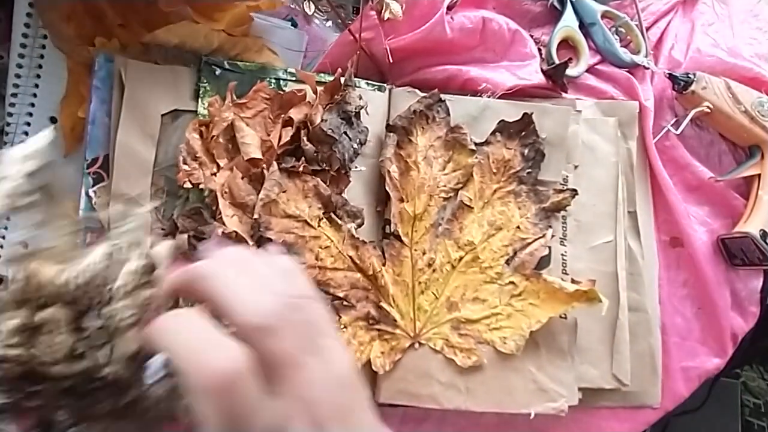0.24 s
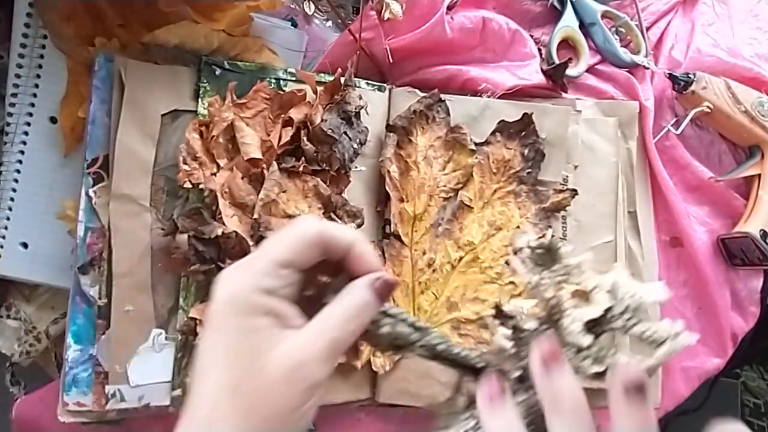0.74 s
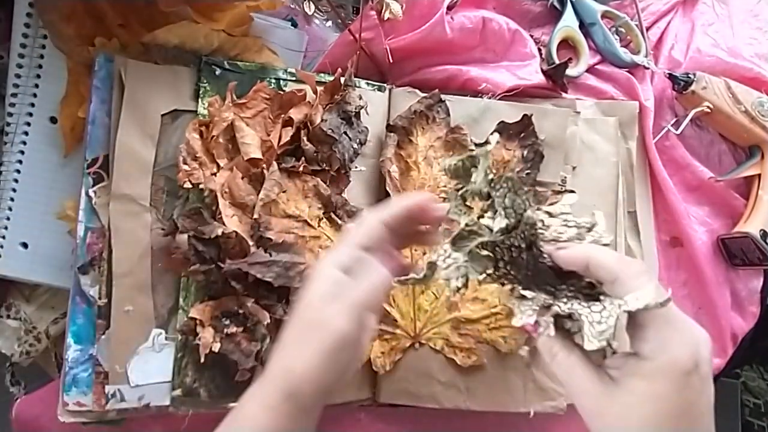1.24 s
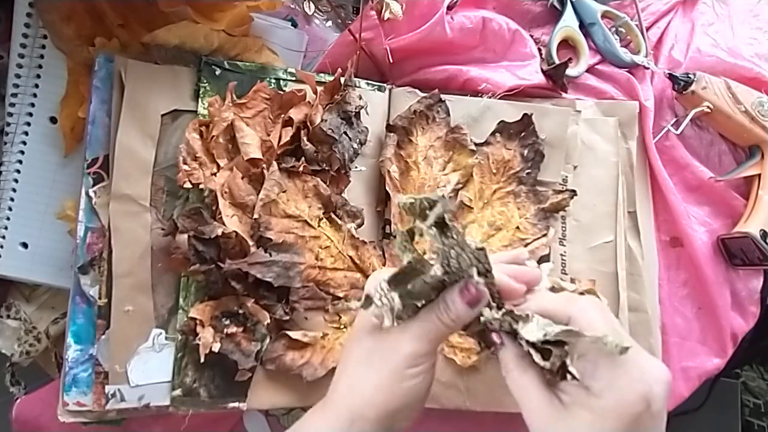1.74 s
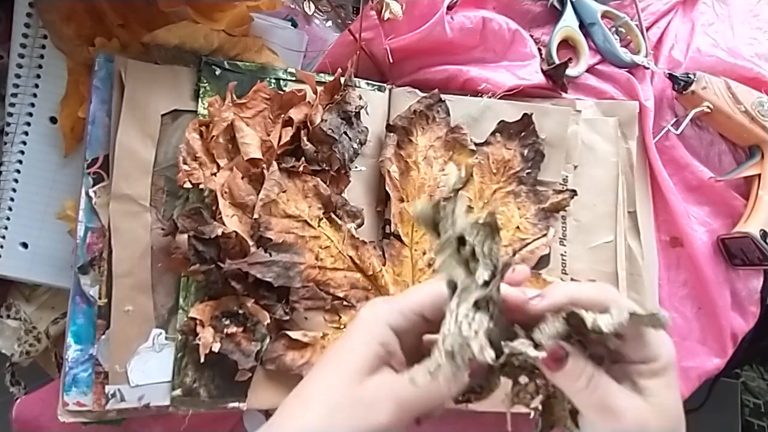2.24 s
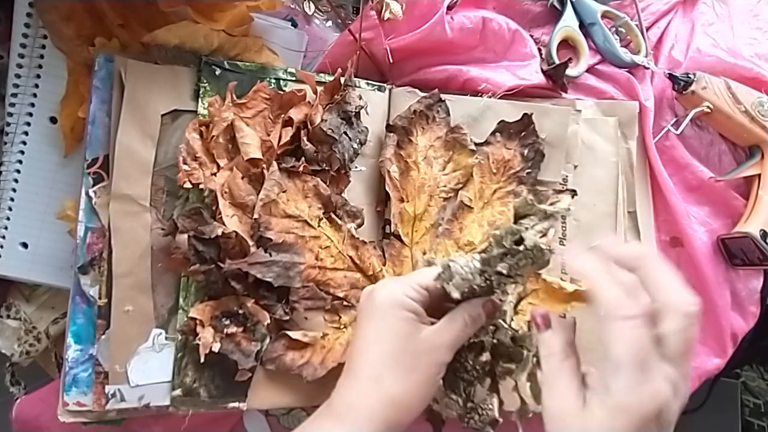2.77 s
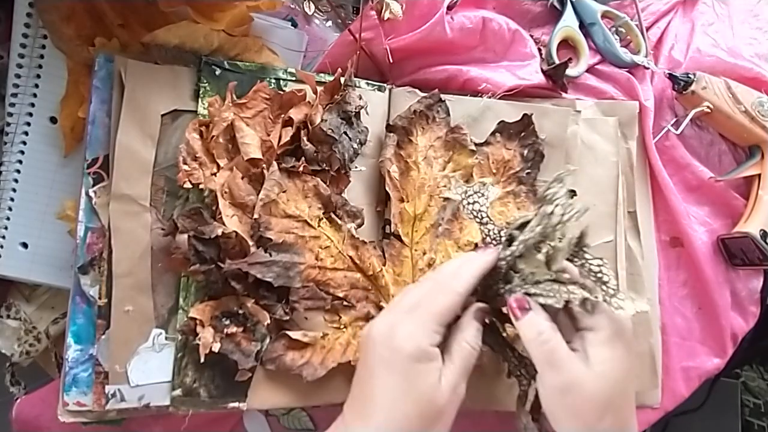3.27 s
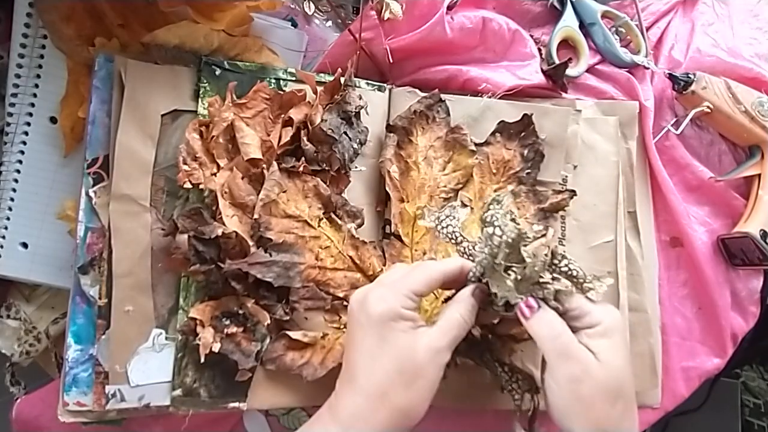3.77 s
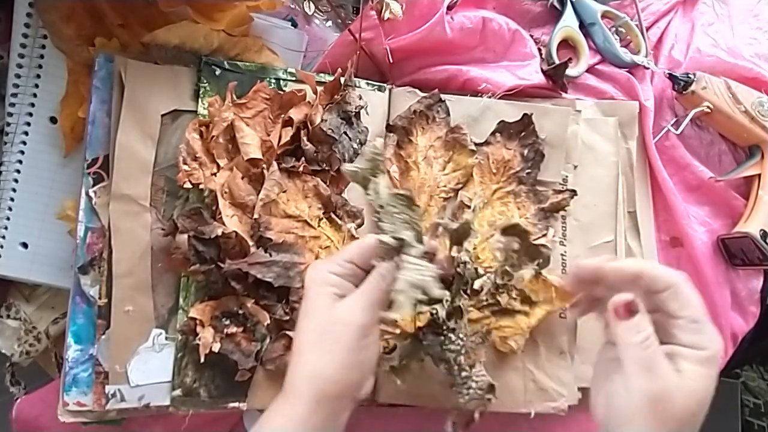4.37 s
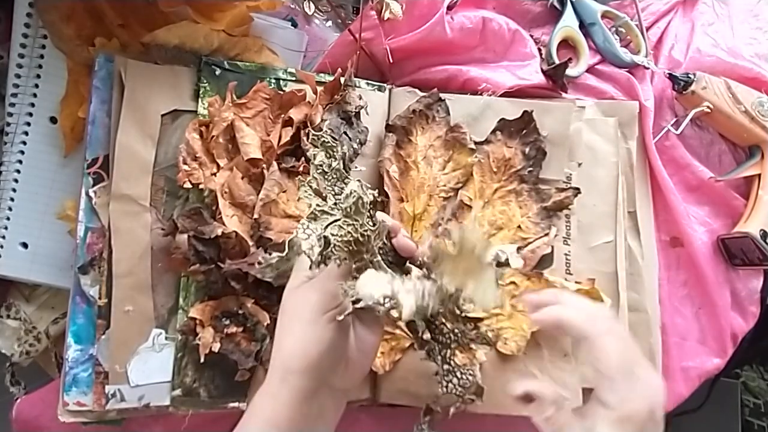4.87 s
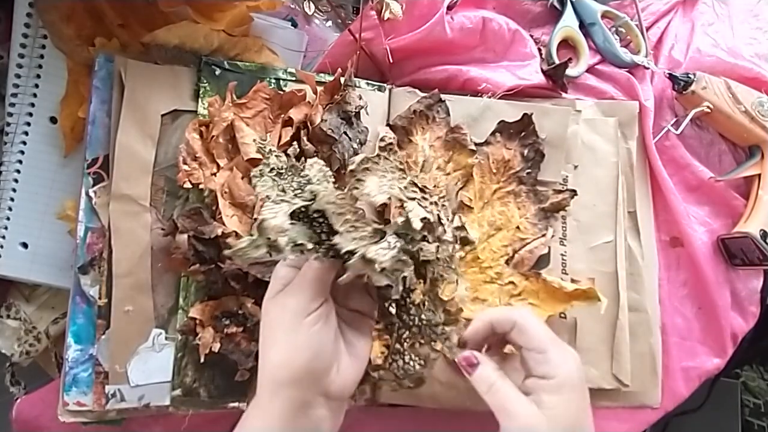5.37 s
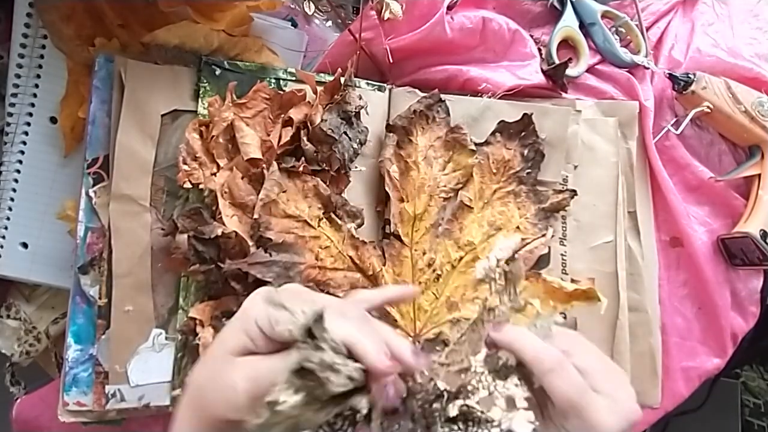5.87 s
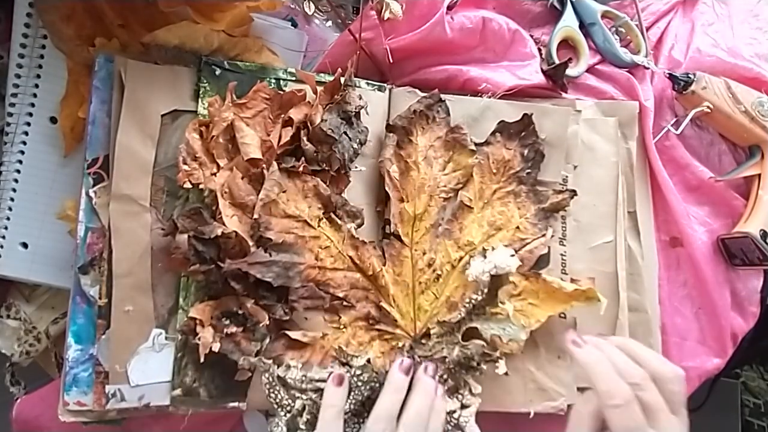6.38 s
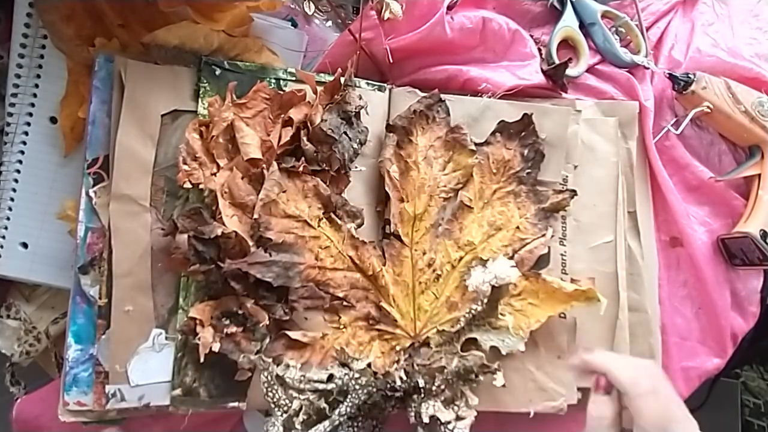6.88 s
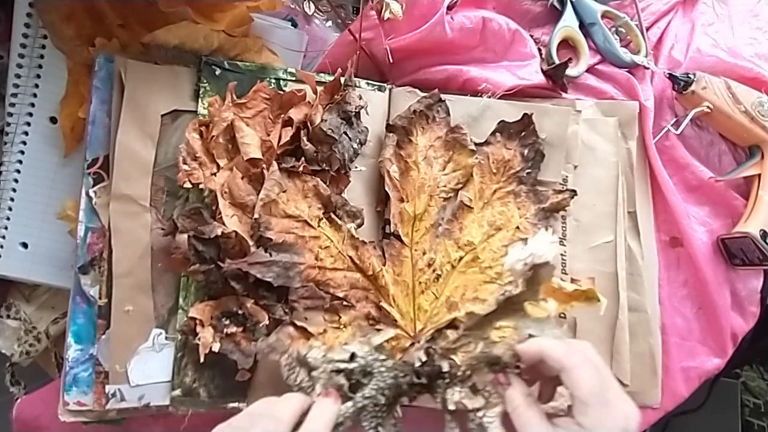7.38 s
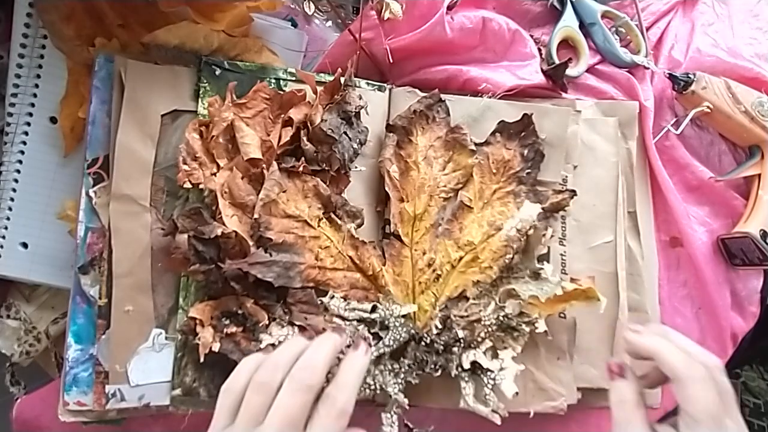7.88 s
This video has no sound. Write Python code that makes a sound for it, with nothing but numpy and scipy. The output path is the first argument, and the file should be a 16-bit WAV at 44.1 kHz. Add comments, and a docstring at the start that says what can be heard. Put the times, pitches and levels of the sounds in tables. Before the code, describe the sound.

Crisp bright crackling of dried leaves in uneven bursts, with sharp snaps and dull crunches, handled close by in a small quiet room.

```python
"""Dry leaves crackle, snap and crunch close by in a small room, as two hands turn a bundle and press it on a paper page.
The crackle is a stream of tiny random fractures, whose pace and loudness follow each squeeze of the fingers.
Snaps are short bursts of noise that ring at their own pitch, then splinter; crunches are duller, slower bursts.
Soft bumps on the table are fading low tones. Faint air noise and a wavering hum lie behind it all."""
import sys
import numpy as np
from scipy import signal
from scipy.fft import rfft, irfft
from scipy.io import wavfile
from scipy.ndimage import uniform_filter1d, map_coordinates

SR = 44100
rng = np.random.default_rng(int(sys.argv[2]) if len(sys.argv) > 2 else 0)


def waveform_to_disk(signal):
    """Save audio, clipped to [-1, 1], as 16-bit WAV at the path in sys.argv[1]."""
    frames = np.transpose(np.atleast_2d(signal))
    scaled = np.clip(frames, -1, 1) * 32767
    samples = np.round(scaled).astype(np.int16)
    wavfile.write(sys.argv[1], SR, samples)


N = 357904
TIME = np.arange(N) / SR

# relative colour of brittle blades cracking: (frequency [Hz], level [dB])
CRACKLE_COLOUR = [(300, -59), (1500, -17.5), (2400, -15.5), (3200, -8.5), (4200, -5.5), (5200, -5),
                  (6400, -0.5), (7400, 1), (9000, -1), (10300, -5), (11800, -9.5), (14000, -9),
                  (16000, -17)]


def amp(db):
    """Turns decibels into a gain."""
    return 10 ** (np.asarray(db) / 20)


def evened(x):
    """Scales a sound to an average (rms) level of 1."""
    return x / np.sqrt(np.mean(x ** 2) + 1e-20)


def read(points, hz):
    """Reads a spectrum table at any frequency, with pitch spaced as we hear it (log frequency)."""
    f, value = np.transpose(points)
    return np.interp(np.log(hz + 1), np.log(f + 1), value)


def follow(rows):
    """Draws each column of a time table as a curve with a value at every sample."""
    s, *columns = np.transpose(rows)
    return [np.interp(TIME, s, c) for c in columns]


def add(mix, s, sound):
    """Mixes a stereo sound in at time s, cut off at the end of the mix."""
    start = max(round(s * SR), 0)
    part = mix[:, start:][:, :sound.shape[1]]
    part += sound[:, :part.shape[1]]


def bins(size=4096):
    """Lists the frequencies on which colours are drawn."""
    return abs(np.fft.fftfreq(size, 1 / SR))


def colour(x, db):
    """Gives a sound the colour drawn on bins(), with a filter of unit energy that never rings ahead of time."""
    # the Hilbert transform finds the phase that puts the energy as early as possible
    spectrum = np.exp(signal.hilbert(np.log(amp(db))).conj())
    ring = np.fft.ifft(spectrum).real[:len(db) // 2]
    ring = ring / np.linalg.norm(ring)
    return signal.oaconvolve(x, ring[None], axes=1)[:, :x.shape[1]]


def background(mono_hz=600, waver=0.12, air_db=-75):
    """Still air and microphone hiss are coloured noise; the faint hum is a few tones whose phase wavers."""
    # relative colour of the air and hiss: (frequency [Hz], level [dB])
    air_colour = [(20, -2), (45, 4.5), (72, 17), (110, 14), (200, 11.5), (330, 9.5), (500, 9.5),
                  (1500, 4.5), (6500, 0.5), (10000, 0.5), (16000, -1)]
    # steady hum in the room: (frequency [Hz], rms level [dB])
    hum_tones = [(100, -97), (180, -100), (296, -92)]
    hz = np.fft.rfftfreq(N, 1 / SR)
    a, b = rfft(rng.standard_normal((2, N)))
    # the two ears share part of the noise in the bass and little in the treble
    same = 0.45 / (1 + (hz / mono_hz) ** 2)
    pair = np.array([a, same * a + np.sqrt(1 - same ** 2) * b])
    air = irfft(pair * amp(read(air_colour, hz)), N)
    # noise kept below 4 Hz makes the slow waver (rms in radians)
    drift = evened(irfft(rfft(rng.standard_normal((len(hum_tones), N))) * (hz < 4), N))
    hum = np.zeros(N)
    for (f, db), d in zip(hum_tones, drift):
        hum += amp(db) * np.sqrt(2) * np.sin(2 * np.pi * f * TIME + waver * d)
    return amp(air_db) * evened(air) + hum


def bumps(rise_s=0.012):
    """A soft hand sets the table swinging for a few cycles: a low tone that rises gently and dies away."""
    # bumps: (time [s], starting level before the gentle rise [dB], pitch [Hz], time to fall by 60 dB [s])
    bump_rows = [(5.62, -53, 92.6, 0.15), (5.721, -71, 100, 0.29), (5.861, -57, 177, .1),
                 (7.455, -70, 85, .2)]
    out, t = np.zeros((2, N)), TIME[:SR // 2]
    for s, db, hz, t60 in bump_rows:
        swing = amp(db) * 1000 ** (-t / t60) * np.sin(2 * np.pi * hz * t)
        softened = swing * (1 - np.exp(-t / rise_s))
        add(out, s, np.tile(softened, (2, 1)))
    return out


def flutter(decay_s, alike, size=600):
    """One fracture: the blade shivers as fading noise, partly alike in the two ears, with unit energy per ear."""
    t = np.arange(size) / SR
    shared, *own = rng.standard_normal((3, size))
    noise = np.sqrt(alike) * shared + np.sqrt(1 - alike) * np.array(own)
    x = noise * np.exp(-t / decay_s)
    return x / np.sqrt(np.sum(x ** 2) / 2)


def echoes(wet_db=-8.5, first_s=.0055, echo_s=.0068, echo_db=-11, mono_hz=1100, size=16384):
    """Near surfaces throw a crack back after a few ms; a short tail of echoes is alike in both ears in the bass."""
    # how fast the room falls silent: (frequency [Hz], time to fall by 60 dB [s])
    room_decay = [(200, 0.36), (1000, 0.15), (4000, 0.26), (8000, 0.22), (16000, 0.22)]
    taps = rng.standard_normal((2, size)) * (rng.random((2, size)) < 4000 / SR)  # about 4000 echoes per s
    hz, t, z = signal.stft(taps, SR, nperseg=256)
    same = np.exp(-(hz / mono_hz) ** 2)[:, None]
    z[1] = same * z[0] + np.sqrt(1 - same ** 2) * z[1]
    fade_db = -60 * t / read(room_decay, hz)[:, None]
    tail = signal.istft(z * amp(fade_db), SR, nperseg=256)[1]
    response = np.zeros((2, size))
    add(response, first_s, amp(wet_db) * tail / np.linalg.norm(tail, axis=1, keepdims=True))
    add(response, echo_s, amp(echo_db) * flutter(decay_s=0.0004, alike=0.098))
    return response


def room(x, spots_per_s=45, count=6):
    """Fractures come from ever different spots of the bundle, and each spot has its own echoes."""
    spot = rng.integers(0, count, N)[(TIME * spots_per_s).astype(int)]
    out = np.zeros((2, N))
    for k in range(count):
        # neighbouring spots blend into each other over 200 samples
        share = np.sqrt(abs(uniform_filter1d(1. * (spot == k), size=200)))
        out += signal.oaconvolve(x * share, echoes(), axes=1)[:, :N]
    return out


def placed(x):
    """The bundle moves: the level and the arrival time differ between the ears by a changing amount."""
    # where the bundle is: (time [s], left minus right level [dB], lag of the left ear [ms])
    place_rows = [(0, 3, -0.11), (.35, -2, -0.14), (.75, -1, 0.22), (1.5, -2.5, .18), (3.2, -1.2, 0.19),
                  (3.7, -1.5, .2), (4.6, -1.5, 0.17), (5.5, -0.5, 0.1), (6.5, -1, 0.16),
                  (7.2, -0.5, -0.0033), (8.1, -0.5, 0.14)]
    side_db, lag_ms = follow(place_rows)
    left = map_coordinates(x[0], [np.arange(N) - lag_ms * SR / 1000], order=5)
    return np.array([left * amp(side_db / 2), x[1] * amp(-side_db / 2)])


def crunch_colour():
    """A buckling blade is heard over the resonances of the book and table top, which lift narrow bands."""
    # relative colour of a buckling blade: (frequency [Hz], level [dB])
    blade_colour = [(20, -47), (60, -30), (160, -18), (280, -12), (420, -3.5), (680, -1.5), (1200, -1),
                    (1550, -6), (2100, 0), (2900, -3), (4500, -2.5), (9000, -46)]
    # resonances of the book and table top: (frequency [Hz], width [Hz], lift [dB])
    desk_rows = [(385, 50, 2), (680, 60, 2), (772, 40, 2.5), (894, 40, 3.5), (1036, 45, 3.5),
                 (1185, 55, 4.5)]
    hz = bins()
    lift_db = sum(db / (1 + (2 * (hz - f) / width) ** 2) for f, width, db in desk_rows)
    return read(blade_colour, hz) + lift_db


def crunches(ring_db=7, ring_octaves=0.27, rise_s=0.0018, give_db=11.5, size=2400):
    """A whole patch of blade buckles over a few ms: a dull, hollow burst of noise with a lift around one pitch."""
    # patches giving way: (time [s], level before the shared lift give_db [dB], centre of the ring [Hz])
    crunch_rows = [(0.744, -27.5, 2060), (0.866, -45, 676), (1.4, -47.5, 2070), (2.027, -35, 630),
                   (2.36, -43.5, 2450), (2.479, -37, 1020), (2.529, -41, 2020), (2.726, -36, 1990),
                   (3.335, -40, 1200), (3.652, -32.5, 1300), (4.526, -43.5, 1190), (4.891, -42.5, 1130),
                   (5.786, -44, 1050), (5.858, -44, 493), (5.877, -36.5, 800), (6.396, -42, 1970),
                   (6.904, -42, 1060), (7.099, -38.5, 720), (7.15, -38, 1160), (7.247, -38, 870),
                   (7.462, -31.5, 716)]
    out, hz, body = np.zeros((2, N)), bins(), crunch_colour()
    rise = 1 - np.exp(-(TIME[:size] / rise_s) ** 2)
    for s, db, ring_hz in crunch_rows:
        octaves = np.log2((hz + 1) / ring_hz)
        shape = body + ring_db * np.exp(-(octaves / ring_octaves) ** 2)
        give = colour(flutter(decay_s=0.0034, alike=0.73, size=size) * rise, shape)
        add(out, s, amp(db + give_db) * evened(give) / np.sqrt(size))
    return out


def handling(build_power=1.4, fade_db=20, fade_power=1.3, stir_db=-91):
    """Fingers close in, then let go slowly at first; overlapping squeezes set crackle, crunch and brightness [dB]."""
    # squeezes, levels at their peak before the trims in rustle():
    # (start [s], build-up [ms], time to fade by fade_db [ms], crackle [dB], crunch [dB], brightness [dB])
    squeeze_rows = [(-0.076, 169.0, 130.0, -48.5, -58, 3.5), (0.155, 31.0, 270.0, -55.5, -68.0, -3.5),
                    (0.304, 33.0, 402.5, -61.5, -74.0, -1), (0.555, 235.0, 80.0, -36.5, -54.5, 0.5),
                    (0.852, 21.0, 111.5, -46.5, -58, -3), (0.93, 121.0, 160.0, -54.5, -74.5, -4),
                    (1.126, 28.0, 60.5, -50, -68.5, -17), (1.191, 98, 148, -39.5, -57.5, 3.5),
                    (1.34, 23, 140.0, -37.5, -70, 1), (1.427, 124.0, 170.0, -46.5, -68.5, 2.5),
                    (1.695, 82.0, 159.5, -49.0, -69, -1.5), (1.826, 42.0, 124, -47.5, -57.5, -9.5),
                    (1.815, 219.0, 141, -38.5, -56.5, 6.5), (2.174, 81.0, 252.5, -45.5, -62.5, -2.5),
                    (2.333, 29.0, 572, -43.5, -69, 3), (2.421, 43, 199, -42, -60, 4),
                    (2.602, 21.0, 109.5, -49.5, -57.5, -9), (2.654, 83.0, 130.0, -39.5, -51, 2.5),
                    (2.801, 97.0, 241, -43.5, -59.5, 3), (3.078, 93.0, 101.5, -45.5, -60, 2),
                    (3.231, 30.0, 100.0, -41.5, -61.5, -3.5), (3.32, 20.0, 130.0, -41.5, -56.5, 8),
                    (3.381, 31.0, 708.5, -49.0, -67, 0.0), (3.6, 87.0, 90.0, -37.5, -66, 3),
                    (3.764, 94.0, 69, -45.5, -64.5, 4.0), (3.984, 67.0, 330.0, -44, -65, 20),
                    (4.058, 130.0, 290.0, -46.5, -57, -4.0), (4.445, 35.0, 201, -55, -70, -4),
                    (4.581, 25.0, 129.5, -61.0, -75.0, -0.5), (4.875, 18.0, 80.0, -48.5, -64, 1),
                    (4.962, 41.0, 178, -55, -66, -7), (5.083, 29.0, 239, -58.5, -75, -4.0),
                    (5.341, 56.0, 50.0, -55.5, -74.0, -0.5), (5.487, 160.0, 737, -60, -78, -8),
                    (5.698, 97.0, 112, -43.0, -63.5, 1), (5.836, 60.0, 230.0, -37.5, -51.5, 2),
                    (6.079, 51.0, 89, -46.5, -53.5, -3.0), (6.341, 78.0, 180.0, -48.5, -59, -5),
                    (6.506, 71.0, 110.0, -55.5, -69.5, -4), (6.863, 73.0, 78.5, -46.0, -63, -2),
                    (6.984, 30.0, 168, -42.5, -56, -4.5), (7.042, 45.0, 438.5, -39.5, -61.5, 0.0),
                    (7.301, 53.0, 259.5, -40, -55, -1.5), (7.407, 48.6, 65, -32.5, -48, 3),
                    (7.499, 22.0, 220.0, -42.5, -57, -4.5), (7.789, 28, 195, -68.5, -69.5, -12),
                    (7.951, 151.0, 121, -43.5, -58.5, -5)]
    t = TIME[::64]
    start, build_ms, fade_ms, crackle_db, crunch_db, bright_db = np.transpose(squeeze_rows)[:, :, None]
    since_ms = (t - start) * 1000
    build = np.clip(since_ms / build_ms, 0, 1) ** build_power
    fade = np.clip((since_ms - build_ms) / fade_ms, 0, 10) ** fade_power
    shape = build * amp(-fade_db * fade)
    # powers add up where squeezes overlap; between them the leaves barely stir
    crackle = (shape * amp(crackle_db)) ** 2
    crunch = (shape * amp(crunch_db)) ** 2
    rest = amp(stir_db) ** 2
    total = crackle.sum(0) + rest
    level_db = 10 * np.log10(total)
    buckle_db = 10 * np.log10(crunch.sum(0) + rest / 10)
    mean_bright_db = (crackle * bright_db).sum(0) / total
    return [np.interp(TIME, t, c) for c in (level_db, buckle_db, mean_bright_db)]


def gripping(level_db):
    """How firmly the fingers hold the leaves (0.35 to 1): a light touch slides, a firm one breaks."""
    return np.interp(level_db, [-68, -48], [.35, 1])


def lesser_snaps(count=56, steepness=3, over_db=4.5, scatter_db=5.5, usual_hz=8430, scatter_octaves=0.26):
    """Small veins break at chance moments, mostly under a firm grip, as loudly as the hands work; rows as in snaps()."""
    level_db = handling()[0]
    grip = gripping(level_db)
    strain = np.cumsum(grip ** steepness)
    # one snap falls in each equal share of the total strain
    at = np.searchsorted(strain / strain[-1], (np.arange(count) + rng.random(count)) / count)
    size, pitch = np.clip(rng.standard_normal((count, 2)), -2, 2).T
    db = level_db[at] + 20 * np.log10(grip[at]) + over_db + scatter_db * size
    return list(zip(TIME[at], db, usual_hz * 2 ** (scatter_octaves * pitch)))


def snaps(ring_db=10, ring_octaves=0.65, tilt_db=4.0, usual_hz=6900, snap_db=17.5, size=2400,
          tear_s=.0004, snap_s=.0011, shower_s=.011, shower_db=-6.5):
    """A vein breaks: a bright crack that rings at its own pitch, then a shower of splinters in the same blade."""
    # the loud single snaps: (time [s], level before the shared lift snap_db [dB], centre of the ring [Hz])
    snap_rows = [(0.0327, -38, 7400), (0.2382, -44, 4160), (0.3515, -42, 4200), (0.6925, -32, 7600),
                 (0.7453, -39.5, 2600), (0.7728, -31, 8200), (0.8055, -33, 6200), (0.8693, -38.5, 3080),
                 (1.04, -42, 3920), (1.1422, -45, 5340), (1.2856, -29, 7600), (1.3608, -30.5, 8900),
                 (1.374, -25, 9600), (1.4018, -27, 8400), (1.4177, -35, 11800), (1.5032, -39.5, 4600),
                 (1.6033, -39.5, 10300), (1.9559, -32, 7100), (1.9886, -30.5, 10600), (2.0607, -43, 9500),
                 (2.36, -34.5, 5070), (2.4718, -27, 9300), (2.481, -32.5, 7700), (2.531, -28, 6200),
                 (2.7496, -38, 3220), (3.1257, -36, 14600), (3.2586, -33, 4320), (3.45, -30.5, 7200),
                 (3.55, -33.5, 6900), (3.656, -35, 3500), (3.6823, -30, 9800), (3.6886, -24.5, 10500),
                 (3.709, -29.5, 9300), (3.8236, -37.5, 6340), (3.8531, -41, 13000), (3.8602, -32, 10800),
                 (4.0145, -39, 6500), (4.0592, -34.5, 10200), (4.1836, -33.5, 7700), (4.4217, -45, 4480),
                 (4.4744, -38, 7600), (4.5264, -40.5, 3440), (4.731, -46.5, 3970), (4.842, -48, 4640),
                 (4.8915, -38, 4420), (5.0092, -46, 6900), (5.1178, -41, 7840), (5.7899, -31, 5570),
                 (5.9047, -37, 6900), (6.398, -34.5, 7100), (6.949, -35.5, 7640), (7.0832, -34, 7600),
                 (7.1682, -31, 9300), (7.2478, -26.5, 4170), (7.3474, -29.5, 8100), (7.402, -28, 7600),
                 (7.4455, -23.5, 7800), (7.463, -28, 3080), (7.5282, -25.5, 9100)]
    out, hz, t = np.zeros((2, N)), bins(), TIME[:size]
    leaf = read(CRACKLE_COLOUR, hz)
    tearing = 1 - np.exp(-t / tear_s)  # the vein takes a moment to tear through
    for s, db, ring_hz in [*snap_rows, *lesser_snaps()]:
        octaves = np.log2(np.maximum(hz, 2000) / ring_hz)
        # small pieces ring higher, die sooner and are brighter all over
        ring = ring_db * np.exp(-(octaves / ring_octaves) ** 2)
        tilt = tilt_db * np.log2(ring_hz / usual_hz) * octaves
        shape = leaf + ring + tilt
        shiver = flutter(decay_s=snap_s * usual_hz / ring_hz, alike=0.047, size=size)
        crack = colour(tearing * shiver, shape)
        crack = crack / np.linalg.norm(crack, axis=1, keepdims=True)
        splinters = flutter(decay_s=shower_s, alike=0, size=size) * rng.exponential(1, size)
        shower = evened(colour(splinters, shape)) / np.sqrt(size)
        add(out, s, amp(db + snap_db) * (crack + amp(shower_db) * shower))
    return out


def grains(sizes, decay_s, alike, count=24):
    """Hands each fracture to one of many facets of the leaves, each with its own shiver."""
    facet = rng.integers(0, count, N)
    out = np.zeros((2, N))
    for k in range(count):
        hits = (sizes * (facet == k))[None]
        out += signal.oaconvolve(hits, flutter(decay_s, alike), axes=1)[:, :N]
    return out


def held(x, span_s):
    """Shares the work of the hands among the fractures of each short span, by evening out the power."""
    power = uniform_filter1d((x ** 2).mean(0), max(int(span_s * SR), 1))
    smooth = uniform_filter1d(power, max(int(span_s * SR / 2), 1))
    return x / np.sqrt(abs(smooth) + 1e-9)


def bending(x, bright_db, pivot_hz, patchy_db, size=256):
    """Resonances come and go as the blades bend (random patches); brightness tips the sound around a pivot pitch."""
    hz, t, z = signal.stft(x, SR, nperseg=size)
    patches = rng.standard_normal((len(t), len(hz))).T
    patches = uniform_filter1d(patches, size=9, axis=1)
    patches = evened(uniform_filter1d(patches, size=6, axis=0))
    slope = np.clip(np.log2(np.maximum(hz, 1) / pivot_hz) / np.log2(3), -.9, .6)[:, None]
    z = z * amp(slope * np.interp(t, TIME, bright_db) + patchy_db * patches)
    return signal.istft(z, SR, nperseg=size)[1][:, :N]


def avalanches(grip, runs_per_s=40, run_s=.009, steady=.2):
    """Under a firm grip one fracture sets off its neighbours: the crackle jumps up and runs out again."""
    starts = (rng.random(N) < runs_per_s / SR) * rng.uniform(.3, 1.7, N)
    runs = signal.lfilter([1], [1, -np.exp(-1 / (run_s * SR))], starts)
    # at full grip, the steady share of the power is left alone
    power = 1 + grip * (1 - steady) * (runs / runs.mean() - 1)
    return np.sqrt(power / uniform_filter1d(power, size=SR // 8))


def rustle(least_per_s=250, per_s=800, rate_per_db=0.75, crunch_spread_db=3, crackle_db=-1.5, crunch_db=-3,
           run_bright=0.17, tick_s=.0006):
    """Blades fracture faster as the hands press: each break gives a fine tick and a duller buckle; sliding hisses."""
    # blades crunch thinner in the air and deeper on the page: (time [s], brightness of the crunch [dB])
    lift_rows = [(0, 1.5), (.5, 7), (.75, -1), (1.3, 2), (2, 4.5), (2.6, 2), (3.3, 9.5), (4.3, 6), (5, 0),
                 (5.85, -1.5), (6.4, 3.5), (7.1, -2), (8.1, 2)]
    level_db, buckle_db, bright_db = handling()
    grip = gripping(level_db)
    runs = avalanches(grip)
    rate = least_per_s + per_s * np.exp(rate_per_db * (level_db - level_db.mean()))
    # a few fractures are large
    sizes = amp(5.5 * np.minimum(rng.exponential(1, N), 3)) * rng.choice([-1, 1], N)
    sizes = sizes * (rng.random(N) < rate / SR)
    # a lighter touch gives a larger share of sliding hiss
    sliding = .55 - .48 * grip
    ticks = held(grains(sizes, decay_s=tick_s, alike=0.15), span_s=0.026)
    hiss = rng.standard_normal((2, N))
    fine = np.sqrt(1 - sliding) * ticks + np.sqrt(sliding) * hiss
    # each avalanche brightens the crackle
    bright_db = np.clip(bright_db, -8, 6) + run_bright * 20 * np.log10(runs)
    fine = bending(colour(fine, read(CRACKLE_COLOUR, bins())), bright_db, pivot_hz=7600, patchy_db=3.5)
    patch_sizes = sizes * amp(crunch_spread_db * rng.standard_normal(N))
    coarse = held(grains(patch_sizes, decay_s=0.0047, alike=0.82), span_s=0.026)
    coarse = colour(coarse, crunch_colour())
    coarse = bending(coarse, follow(lift_rows)[0], pivot_hz=1200, patchy_db=4.5, size=1024)
    return runs * (amp(level_db + crackle_db) * fine + amp(buckle_db + crunch_db) * coarse)


def scene():
    """Adds the leaves and their room echoes to the table bumps and the background."""
    leaves = placed(rustle() + snaps() + crunches())
    return background() + bumps() + room(leaves) + leaves


def record(dry, edge_hz=15950):
    """The two microphones differ a little in colour; a low-pass filter then removes the highest treble."""
    # microphone difference: (frequency [Hz], left minus right level [dB])
    port_rows = [(200, -1), (1000, -0.5), (4000, -.7), (7000, -0.6), (9800, 3), (13000, -1.5)]
    side_db = read(port_rows, np.fft.rfftfreq(N, 1 / SR))
    heard = irfft(rfft(dry) * amp([side_db / 2, -side_db / 2]), N)
    low_pass = signal.firwin(301, edge_hz, window=("kaiser", 9), fs=SR)
    return signal.oaconvolve(heard, low_pass[None], "same")


dry = scene()
out = record(dry)
waveform_to_disk(out)
```